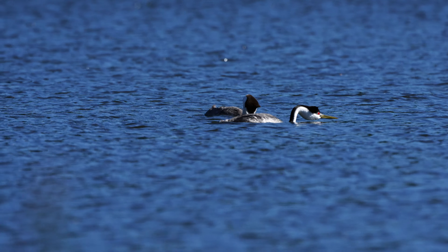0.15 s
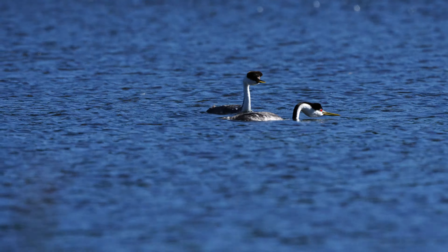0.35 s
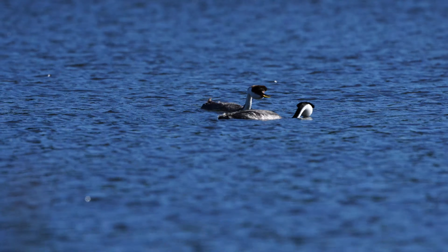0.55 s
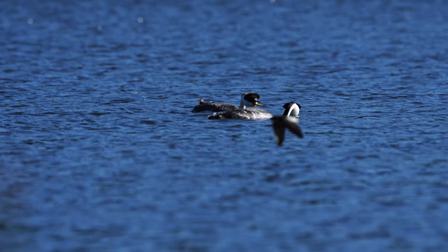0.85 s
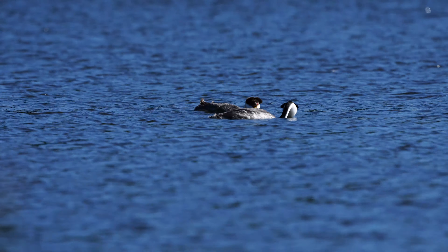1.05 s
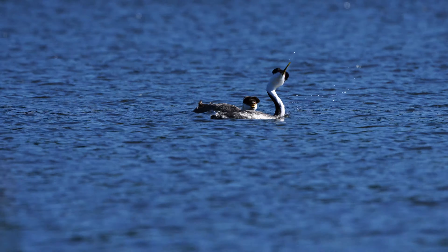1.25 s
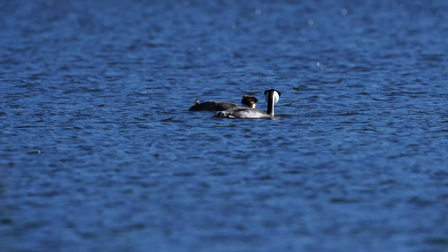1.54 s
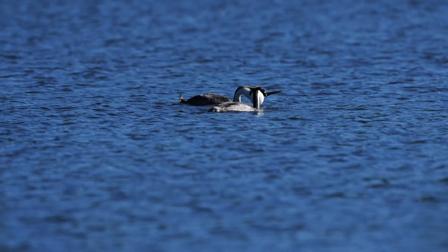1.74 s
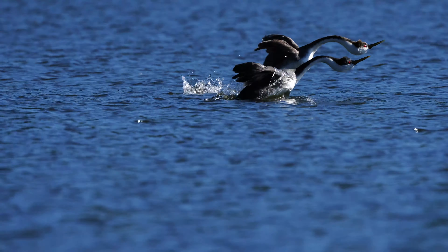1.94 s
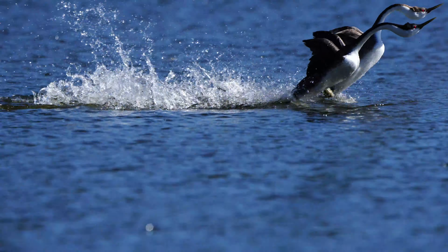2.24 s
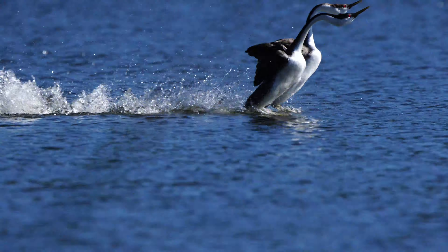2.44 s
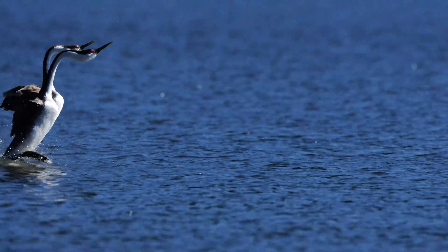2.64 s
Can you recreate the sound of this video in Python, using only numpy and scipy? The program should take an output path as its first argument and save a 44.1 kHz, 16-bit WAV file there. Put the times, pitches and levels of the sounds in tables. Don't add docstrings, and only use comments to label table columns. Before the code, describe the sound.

Dry, chattering grebe calls rattle across a windy lake, then wet feet patter on water

```python
import sys
import numpy as np
from scipy import signal
from scipy.fft import rfft, irfft, next_fast_len
from scipy.io import wavfile
from scipy.ndimage import uniform_filter1d

SR = 44100
rng = np.random.default_rng(int(sys.argv[2]) if len(sys.argv) > 2 else 0)


def attenuation_scalar(level_db):
    decades = np.asarray(level_db, float) / 20
    return 10 ** decades


def store_wav(level_fs):
    pcm = np.round(np.clip(np.atleast_2d(level_fs), -1, 1) * 32767)
    wavfile.write(sys.argv[1], SR, pcm.T.astype(np.int16))


N = 123039

# (frequency [Hz], level per Hz [dB])
HISS_COLOUR = [(200, -19.5), (800, 9), (1500, 5), (3800, -1), (6100, -5), (9500, -2), (15500, -8)]
# (time [s], level [dB])
HISS_LEVEL = [(0, -51), (1.5, -44.5), (1.85, -43.5), (2.06, -46), (2.45, -46), (2.79, -44.5)]
# (time [s], level [dB])
WIND_GUSTS = [(0, -33.5), (.06, -31.5), (.143, -21.5), (.21, -27), (.6, -33), (.715, -29.5), (.765, -21),
              (.85, -30), (.94, -23.5), (1.15, -28), (1.2, -26.5), (1.65, -26), (1.88, -17.5), (2.03, -19),
              (2.11, -21), (2.27, -18.5), (2.5, -24.5), (2.59, -23.5)]
# (frequency [Hz], level [dB])
EDDY_SIZES = [(28, -15), (50, -4.5), (90, -2.5), (150, -3), (240, -4.5), (380, -9), (580, -17.5),
              (850, -28.5)]
# (time [s], peak level [dB], frequency [Hz])
STRONG_EDDIES = [(0.007, -20.5, 155), (0.024, -29.5, 115), (0.117, -16, 213), (0.143, -10.5, 290),
                 (0.162, -10.5, 144), (0.256, -23, 120), (0.762, -24, 165), (0.8, -20, 149),
                 (0.925, -17, 162), (0.944, -24, 153), (0.967, -16.5, 213), (1.043, -14, 232),
                 (1.106, -19, 143), (1.126, -18, 170), (1.152, -14, 275), (1.206, -23, 153),
                 (1.239, -16.5, 145), (1.332, -16, 232), (1.403, -15, 225), (1.463, -20.5, 149),
                 (1.538, -16, 129), (1.582, -14.8, 190), (1.604, -18.5, 148), (1.678, -14, 150),
                 (1.695, -24, 162), (1.782, -13, 105), (1.838, -19, 143), (1.857, -15, 229),
                 (1.876, -6.5, 210), (1.905, -11, 141), (1.968, -14, 284), (2.025, -8, 190),
                 (2.138, -17, 191), (2.16, -29, 132), (2.204, -12.5, 174), (2.234, -14.5, 147),
                 (2.268, -10.5, 264), (2.307, -22, 136), (2.359, -20, 127), (2.416, -15.5, 173),
                 (2.454, -11.5, 220), (2.517, -18, 138), (2.575, -18, 142), (2.602, -14.5, 140),
                 (2.63, -16, 115), (2.7, -18, 122), (2.747, -35, 152), (2.788, -26.5, 112), (.74, -22, 203),
                 (.782, -18, 302), (.884, -21, 300), (1.755, -20, 403), (2.031, -17, 382),
                 (2.192, -14, 383), (2.588, -14, 202)]
# (time [s], peak level [dB])
FOOT_SLAPS = [
    (2.14, -31.5),
    (2.546, -25.5),
    (2.602, -26.5),
    (2.659, -26),
    (2.718, -29.5),
    (2.774, -26),
]
# (start [s], peak level [dB], pitch [Hz], hold [s])
FAR_CLICKS = [(0.875, -39, 1840, 0.005), (0.9, -44, 1650, 0.004), (0.915, -46, 1880, 0.012),
              (1.021, -40, 1700, 0.003), (1.03, -34.5, 1705, 0.0067), (1.039, -43, 1730, 0.006),
              (1.055, -44, 1960, 0.004), (1.091, -45, 2450, 0.006), (1.187, -37, 1800, 0.0063),
              (1.198, -33.5, 1800, 0.0068), (1.209, -39, 1700, 0.0047), (1.376, -36, 1750, 0.0033),
              (1.556, -33.5, 1920, 0.01), (0.104, -38, 1620, 0.0053), (2.494, -43.5, 5700, 0.03)]
# (start [s], peak level [dB], pitch [Hz], hold [s])
FIRST_TRILL = [(0.0002, -25, 2350, 0.0078), (0.0087, -27.5, 2570, 0.0011), (0.053, -28, 2470, 0.0022),
               (0.0617, -25.5, 2250, 0.0033), (0.071, -26, 2190, 0.0034), (0.0814, -32, 2380, 0.0024),
               (0.0943, -21, 2404, 0.0022), (0.101, -27.5, 2790, 0.0017), (0.115, -31, 2170, 0.0023),
               (0.1247, -27, 2560, 0.0051), (0.148, -26.5, 2360, 0.0024), (0.153, -23, 2530, 0.0035),
               (0.16, -30, 2770, 0.0015), (0.182, -30, 2660, 0.0041), (0.1873, -25, 2370, 0.003),
               (0.211, -24, 2580, 0.0037), (0.218, -26, 2370, 0.0087), (0.2455, -21.5, 2430, 0.0018),
               (0.254, -29, 2650, 0.002), (0.2716, -23.5, 2120, 0.0021), (0.278, -19.5, 2410, 0.0014),
               (0.3168, -22, 2130, 0.0018), (0.3218, -28.5, 2210, 0.0057),
               (0.3587, -28.5, 2830, 0.0014), (0.368, -25, 1990, 0.0011),
                       (0.3746, -35, 1980, 0.002), (0.423, -27, 2330, 0.0016), (0.437, -36, 2700, 0.001),
                       (0.456, -28, 2310, 0.002), (0.486, -30.5, 2450, 0.0028), (0.5, -29, 2470, 0.0023),
                       (0.522, -29, 2200, 0.0043), (0.564, -27, 2500, 0.004), (0.59, -27, 2214, 0.0072),
                       (0.6, -26, 2430, 0.0016), (0.6537, -23, 2450, 0.0055), (0.6635, -23.5, 2500, 0.0028),
                       (0.727, -27, 2145, 0.0097), (0.7356, -27.5, 2550, 0.011), (0.833, -25, 2450, 0.0074)]
# (start [s], peak level [dB], pitch [Hz], hold [s])
SECOND_TRILL = [(1.215, -25.5, 2230, 0.0056), (1.2215, -23, 2314, 0.0074),
                (1.236, -24, 2350, 0.0043), (1.246, -26.5, 2410, 0.0021),
                (1.274, -24, 2240, 0.0023), (1.282, -24.5, 2320, 0.0025),
                (1.3105, -23.5, 2440, 0.0044), (1.3245, -32, 2700, 0.002),
                (1.3405, -27, 2540, 0.0056), (1.35, -36, 2570, 0.004), (1.359, -34, 2200, 0.0018),
                (1.3672, -20.5, 2620, 0.0031), (1.375, -22.5, 2700, 0.0026),
                (1.3863, -25.5, 1970, 0.00098), (1.3942, -25, 2530, 0.0044),
                (1.402, -22, 2530, 0.0051), (1.4245, -22, 2620, 0.0029),
                (1.4302, -22, 2575, 0.0059), (1.4528, -21, 2630, 0.0035),
                (1.4578, -22.5, 2570, 0.0051), (1.473, -29, 2240, 0.0024),
                (1.4832, -23, 2595, 0.0073),
                (1.507, -42, 2600, 0.0036), (1.515, -17, 2380, 0.0013), (1.521, -20.5, 2660, 0.0038),
                     (1.53, -29, 2630, 0.0031), (1.536, -34, 2660, 0.0047), (1.5504, -16, 2580, 0.0007),
                     (1.5586, -17, 2540, 0.0014), (1.5645, -40, 2450, 0.0034),
                     (1.5868, -19.5, 2310, 0.0018), (1.5948, -16.5, 2530, 0.0012),
                     (1.6228, -17.5, 2360, 0.0011), (1.6314, -18, 2610, 0.00091),
                     (1.6373, -24.5, 2330, 0.0039), (1.659, -21.5, 2280, 0.0039),
                     (1.6676, -15.5, 2450, 0.0014), (1.7053, -19.5, 2285, 0.0028),
                     (1.71, -24.5, 2330, 0.0049), (1.761, -35, 2300, 0.002), (1.7707, -22, 2150, 0.0039),
                     (1.7757, -20, 2510, 0.0085), (1.856, -18, 2360, 0.011), (1.8672, -19, 2644, 0.0056)]

HISS_UP_DB, HISS_SAME, HISS_PATCH_DB = 6, 0.12, 1.22

USUAL_DB, GROWTH, GROWTH_HZ, FLICKER_DB = -25.5, 2.26, 213, 1.2
EDDY_CROWD, EDDY_SPREAD_DB, EDDY_CYCLES = 0.45, 4, 1.156
PUFF_DB, PUFF_S = 4.5, 0.0095
KNOCK_UP_DB, KNOCK_CYCLES, KNOCK_EDGE_DB = -1, 1.55, -9.5
PORT_LAG_S, PORT_HZ, PORT_TILT_DB, PORT_OWN_DB = 0.0013, 410, 3, -11.5
WAVELET_MIDDLE_S = 0.06

RISE_S, RING_T60 = 0.0008, 0.0096
SCOOP, SCOOP_S, WOBBLE = 0.16, 0.0013, 0.045
SNAP_DB, RASP_RATIO = -6, 1.6
TWIN_DB, TWIN_APART, TWIN_T60 = -9, 0.11, 0.012
OCTAVE_DB, OCTAVE_DB_PER_KHZ, OCTAVE_DB_PER_MS = -14, -4, -0.8
OCTAVE_PER_DB, OCTAVE_SPREAD_DB = 0.15, 2

SLAP_HZ, SLAP_T60 = 1800, 0.025
BIRD_PAN_DB, BIRD_LEAD_S = -2, 0.00006
ECHO_DB, ECHO_T60, SHORE_DB, SHORE_T60 = -16.5, 0.011, -12, 0.093

DUCK_FROM_DB, DUCK, RECOVER_DB_PER_S, SOFT_LIMIT = -20.5, 0.68, 60, 0.55


def evened(x):
    return x / np.sqrt(np.mean(x ** 2) + 1e-20)


def smoothed(x, size):
    return uniform_filter1d(uniform_filter1d(x, size), size)


def curve(points):
    return np.interp(np.arange(N) / SR, *np.transpose(points))


def add(mix, s, sound):
    part = mix[max(round(s * SR), 0):][:len(sound)]
    part += sound[:len(part)]


def shifted(x, lag_s, tilt_db=0., hz_corner=1e9):
    size = next_fast_len(N + 999)
    hz = np.fft.rfftfreq(size, 1 / SR)
    delay = np.exp(-2j * np.pi * hz * lag_s / (1 + hz / hz_corner))
    tilt = attenuation_scalar(tilt_db * np.log2(1 + (2 * hz / hz_corner) ** 2) / 2)
    return irfft(rfft(x, size) * delay * tilt, size)[:N]


def hiss():
    frames, hz = N // 128 + 5, np.fft.rfftfreq(512, 1 / SR)
    a, b, c, d, patches = rng.standard_normal((frames, 257, 5)).T
    patches = evened(uniform_filter1d(uniform_filter1d(patches, 40, 0), 12, 1))
    left = a + 1j * b
    late = np.exp(-2j * np.pi * hz * BIRD_LEAD_S)[:, None]
    right = HISS_SAME * left * late + np.sqrt(1 - HISS_SAME ** 2) * (c + 1j * d)
    f, db = np.transpose(HISS_COLOUR)
    colour_db = np.interp(np.log(hz + 1), np.log(f), db)[:, None]
    spectrum = np.array([left, right]) * attenuation_scalar(colour_db + HISS_PATCH_DB * patches)
    noise = signal.istft(spectrum, nperseg=512, noverlap=384)[1][:, :N]
    return attenuation_scalar(curve(HISS_LEVEL) + HISS_UP_DB) * evened(noise)


def wavelet(hz, cycles, phase):
    u = (np.arange(round(2 * WAVELET_MIDDLE_S * SR)) / SR - WAVELET_MIDDLE_S) * hz
    bell = np.exp(-(2 * u / cycles) ** 2)
    wiggle = bell * np.cos(2 * np.pi * u + phase)
    return wiggle - bell * wiggle.sum() / bell.sum()


def rolling_eddies():
    t, lead = np.arange(N) / SR, round(WAVELET_MIDDLE_S * SR)
    puffs = sum(np.exp(-((t - row[0]) / PUFF_S) ** 2) for row in STRONG_EDDIES)
    force_db = curve(WIND_GUSTS) - USUAL_DB + PUFF_DB * (puffs - 0.5)
    flicker = evened(smoothed(rng.standard_normal(N), 500))
    out = np.zeros((3, N))
    for hz, db in EDDY_SIZES:
        growth = GROWTH * hz / (hz + GROWTH_HZ)
        per_s = EDDY_CROWD * 20 * np.sqrt(hz)
        level = attenuation_scalar(USUAL_DB - 6.5 + db + growth * (force_db + FLICKER_DB * flicker))
        for phase in (0, np.pi / 2):
            when, size, sign = rng.random((3, 3, N))
            strength = np.sign(sign - 0.5) * attenuation_scalar(-EDDY_SPREAD_DB * np.log(size + 0.04))
            train = (when < per_s / SR) * strength
            eddies = signal.fftconvolve(train, wavelet(hz, EDDY_CYCLES, phase)[None], axes=1)
            out += evened(eddies[:, lead:N + lead]) * level
    return out


def strong_knocks():
    lead = round(WAVELET_MIDDLE_S * SR)
    knocks = np.zeros(N + lead)
    for (s, db, hz), phase in zip(STRONG_EDDIES, rng.random(len(STRONG_EDDIES))):
        thump = sum(attenuation_scalar(KNOCK_EDGE_DB * k) * wavelet(hz * 2 ** k, KNOCK_CYCLES, 2 * np.pi * phase)
                    for k in range(3))
        add(knocks, s, attenuation_scalar(db + KNOCK_UP_DB) * thump)
    return knocks[lead:]


def wind():
    eddies = rolling_eddies()
    shared = eddies[0] + strong_knocks()
    left = shifted(shared, PORT_LAG_S, PORT_TILT_DB / 2, PORT_HZ)
    right = shifted(shared, 0, -PORT_TILT_DB / 2, PORT_HZ)
    return np.array([left, right]) + attenuation_scalar(PORT_OWN_DB) * eddies[1:]


def slap(s, peak_db):
    t = np.arange(2000) / SR
    fringe = evened(np.diff(uniform_filter1d(rng.standard_normal(len(t)), size=12), prepend=0))
    smack = np.sin(2 * np.pi * SLAP_HZ * t) * np.exp(-SLAP_HZ * t)
    return s, attenuation_scalar(peak_db) * (2 * smack + 0.5 * fringe * attenuation_scalar(-60 * t / SLAP_T60))


def click(start, peak_db, hz, hold):
    t, chance = np.arange(1800) / SR, rng.standard_normal((3, 1800))
    scoop = SCOOP * (0.5 * np.exp(-hold / SCOOP_S / 2) - np.exp(-t / SCOOP_S))
    wobble = WOBBLE * evened(uniform_filter1d(chance[0], size=60))
    turn = 2 * np.pi * np.cumsum(hz * (1 + scoop + wobble)) / SR
    rise = np.sin(np.pi / 2 * np.minimum(t / RISE_S, 1)) ** 2
    after = np.maximum(t - RISE_S - 0.86 * hold, 0)
    octave_db = OCTAVE_DB + OCTAVE_DB_PER_KHZ * (hz - 2300) / 1000
    octave_db += OCTAVE_DB_PER_MS * (1000 * hold - 3) + OCTAVE_PER_DB * (peak_db + 18.5)
    octave_db += OCTAVE_SPREAD_DB * chance[2, 2]
    whistle = np.sin(turn) + attenuation_scalar(octave_db) * np.sin(2 * turn)
    twin_ratio = 1 + TWIN_APART * np.tanh(chance[2, 0] + 1)
    twin = attenuation_scalar(TWIN_DB) * np.sin(turn * twin_ratio + 2 * chance[2, 1])
    rasp = evened(smoothed(chance[1], 9)) * np.sin(RASP_RATIO * turn)
    snap = attenuation_scalar(SNAP_DB - 60 * t / RING_T60 / 2) * rasp
    voice = whistle * attenuation_scalar(-60 * after / RING_T60) + twin * attenuation_scalar(-60 * after / TWIN_T60) + snap
    return start - 0.5 * RISE_S, attenuation_scalar(peak_db) * rise * voice


def tail(t60, seconds, share):
    shape = (2, round(seconds * SR))
    dying = attenuation_scalar(-60 * np.arange(shape[1]) / SR / t60)
    taps = rng.standard_normal(shape) * (rng.random(shape) < share) * dying
    taps[:, :60] = 0
    return taps / np.linalg.norm(taps, axis=1, keepdims=True)


def birds():
    calls, feet = np.zeros((2, N))
    first_trill = FIRST_TRILL
    second_trill = SECOND_TRILL
    for row in first_trill + second_trill + FAR_CLICKS:
        add(calls, *click(*row))
    for row in FOOT_SLAPS:
        add(feet, *slap(*row))
    distance = signal.butter(4, 6600., fs=SR, output="sos")
    calls, feet = signal.sosfilt(distance, [calls, feet])
    space = attenuation_scalar(SHORE_DB) * tail(SHORE_T60, 0.43, 0.033)
    space[:, :round(0.03 * SR)] += attenuation_scalar(ECHO_DB) * tail(ECHO_T60, 0.03, 0.017)
    echoes = signal.fftconvolve(calls[None], space, axes=1)[:, :N]
    pair = np.array([calls, shifted(calls, BIRD_LEAD_S)]) + echoes
    pan = attenuation_scalar([[BIRD_PAN_DB / 2], [-BIRD_PAN_DB / 2]])
    return pair * pan + np.array([feet, shifted(feet, BIRD_LEAD_S)])


def scene():
    return hiss() + wind() + birds()


def top_cut(x):
    return signal.sosfilt(signal.butter(12, 15870, fs=SR, output="sos"), x)


def record(dry):
    power_db = 10 * np.log10(smoothed((dry ** 2).mean(0), 1500) + 1e-9)
    fall = np.arange(N) * RECOVER_DB_PER_S / SR
    held_db = np.maximum.accumulate(power_db + fall) - fall
    ducked = dry / attenuation_scalar(DUCK * np.maximum(held_db - DUCK_FROM_DB, 0))
    limited = SOFT_LIMIT * np.tanh(ducked / SOFT_LIMIT)
    low_cut = signal.butter(2, 22., "high", fs=SR, output="sos")
    return top_cut(signal.sosfilt(low_cut, limited))


dry = scene()
out = record(dry)
store_wav(out)
```